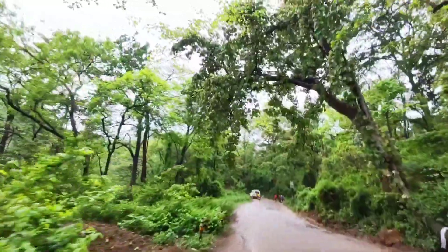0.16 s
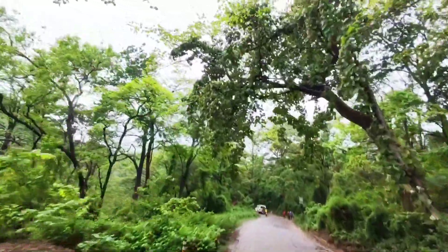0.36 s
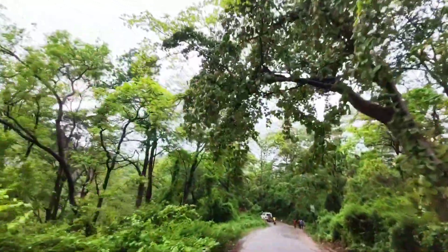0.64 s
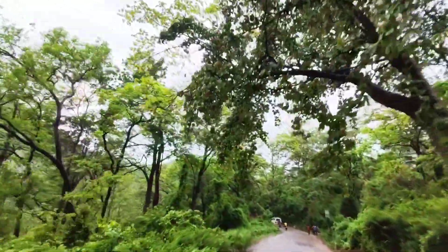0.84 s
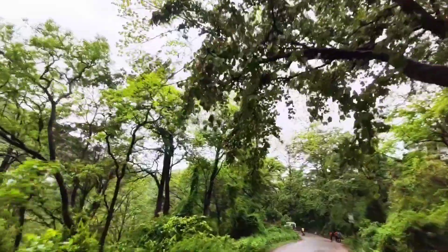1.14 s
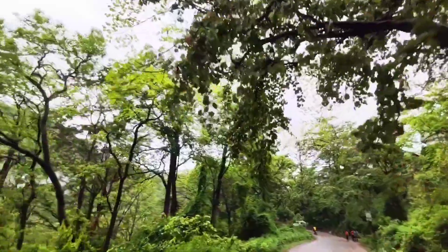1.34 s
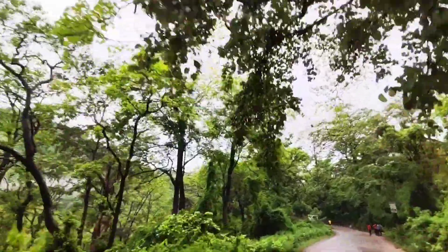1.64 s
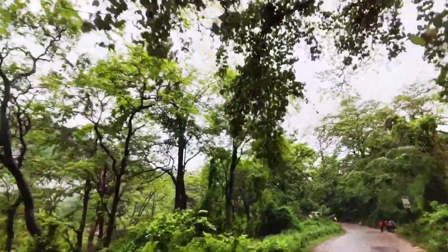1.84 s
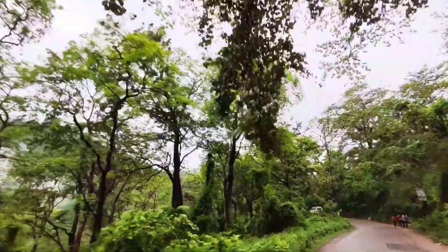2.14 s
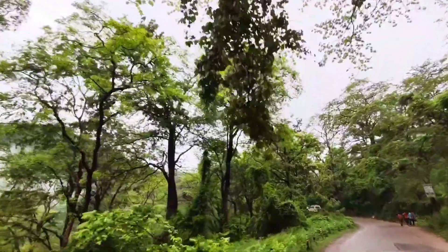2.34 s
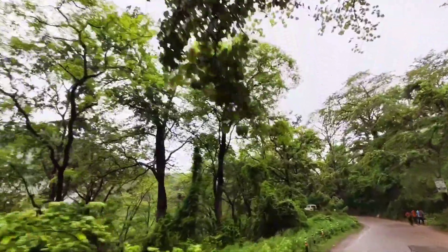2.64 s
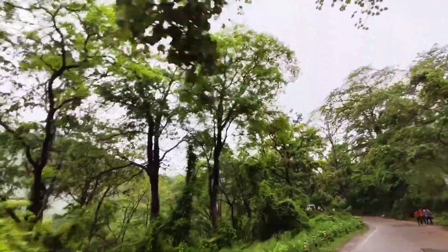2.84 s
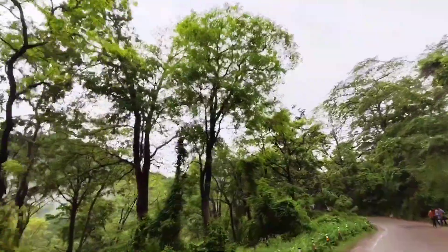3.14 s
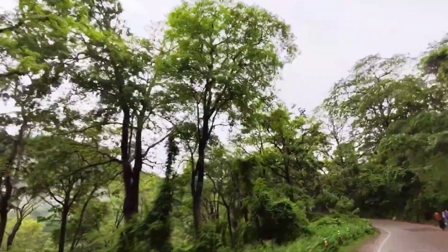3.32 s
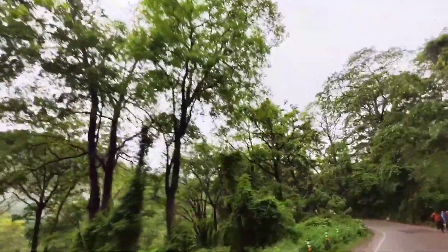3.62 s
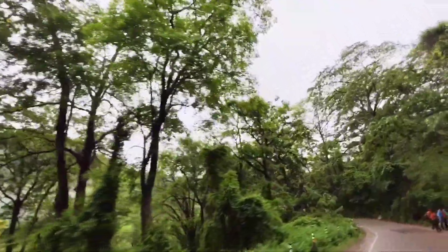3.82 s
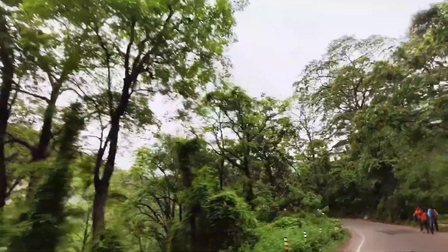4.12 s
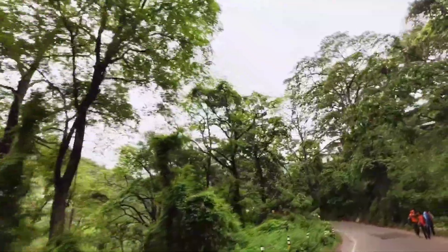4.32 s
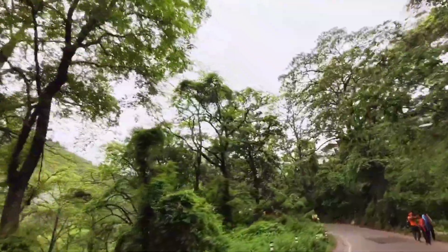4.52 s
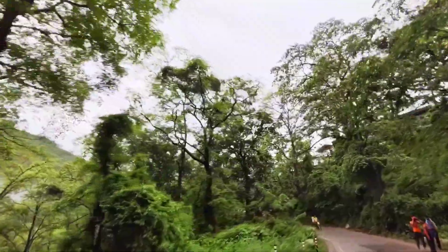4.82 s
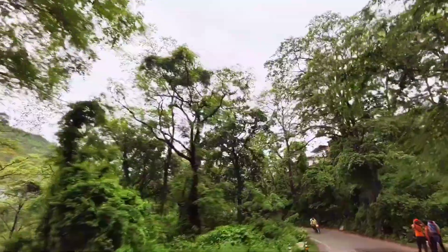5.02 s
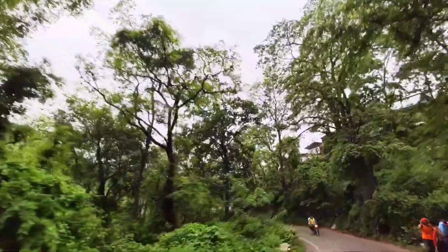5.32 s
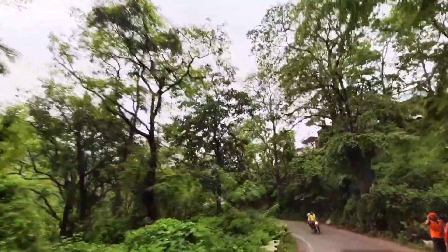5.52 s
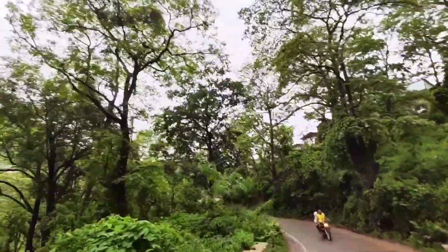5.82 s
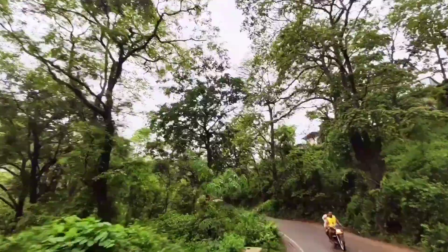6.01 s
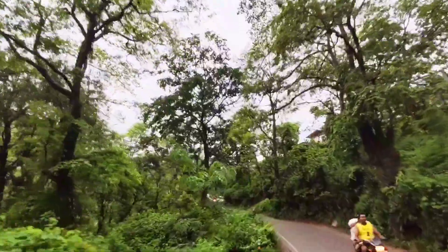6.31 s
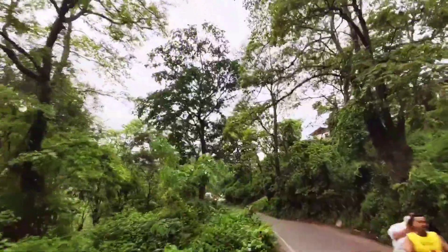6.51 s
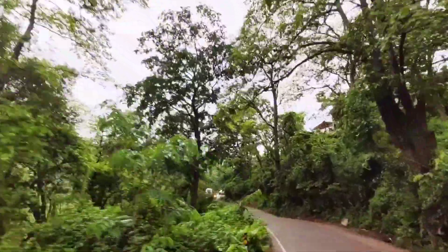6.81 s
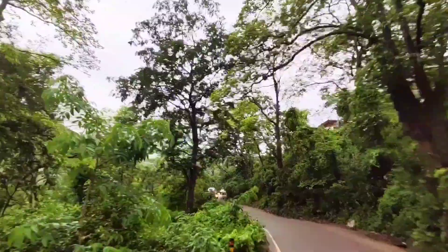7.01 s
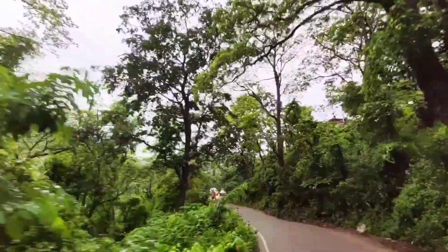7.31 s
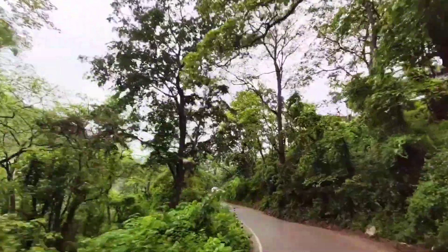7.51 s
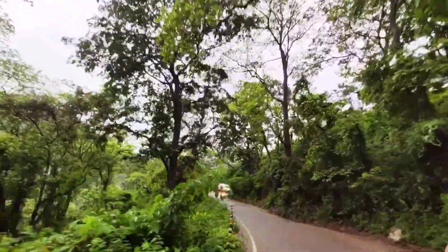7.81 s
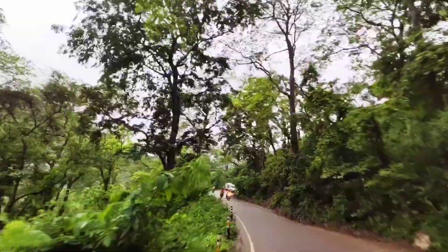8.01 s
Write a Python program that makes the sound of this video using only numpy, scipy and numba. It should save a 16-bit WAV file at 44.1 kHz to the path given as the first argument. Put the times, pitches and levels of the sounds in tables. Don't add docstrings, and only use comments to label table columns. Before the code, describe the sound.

Low wind rumble batters a handheld phone on a moving scooter, fluttering separately left and right. Beneath it the exhaust drones, gears whine upward and wet tyres hiss. Thin, high horns toot from ahead, each nearer, with smeared tree echoes. The throttle eases around two short close toots, then reopens into the hardest gusts. Finally oncoming tyres swish and a lower horn sounds at right.

```python
import sys
import numpy as np
from scipy import signal
from scipy.fft import rfft, irfft, next_fast_len
from scipy.io import wavfile
from scipy.ndimage import uniform_filter1d, minimum_filter1d
from numba import njit

SR = 44100
rng = np.random.default_rng(int(sys.argv[2]) if len(sys.argv) > 2 else 0)


def store_pcm(level_fs):
    pcm = np.round(np.clip(level_fs, -1, 1) * 32767).astype(np.int16)
    wavfile.write(sys.argv[1], SR, np.atleast_2d(pcm).T)


def makeup_ratio(level_db):
    decades = np.asarray(level_db, float) / 20
    return 10 ** decades


N = 359415
TIME = np.arange(N) / SR


def unit(x):
    return x / np.sqrt(np.mean(x ** 2) + 1e-18)


def columns(table):
    seconds, *rest = np.transpose(table)
    return [np.interp(TIME, seconds, column) for column in rest]


def sides(pan_db):
    return makeup_ratio(np.array([pan_db, -pan_db]) / 2)


def around(start, end):
    return np.arange(max(int(start * SR), 0), min(int(end * SR), N))


def bell(middle, half):
    return np.exp(-((TIME - middle) / half) ** 2)


def gate(start, length, fade):
    return np.clip(np.minimum(TIME - start, start + length - TIME) / fade, 0, 1)


@njit
def svf(x, hz, width):
    y, b, l = np.empty(len(x)), 0., 0.
    for i in range(len(x)):
        g, k = np.tan(np.pi * hz[i] / SR), width / hz[i]
        v = (b + g * (x[i] - l)) / (1 + g * (g + k))
        b, l, y[i] = 2 * v - b, l + 2 * g * v, k * v
    return y


def svf_twice(x, hz, width):
    return svf(svf(x, hz, 1. * width), hz, 1. * width)


def band(x, hz, width):
    return svf(x, np.full(len(x), 1. * hz), 1. * width)


def walk(rate):
    hold = int(SR / rate)
    steps = np.repeat(rng.standard_normal(N // hold + 1), hold)
    return 1.3 * uniform_filter1d(uniform_filter1d(steps, hold), hold)[:N]


def coloured(spectrum, flicker_db, rate, rise_db=0):
    size = next_fast_len(N)
    octave = np.log2(np.maximum(np.fft.rfftfreq(size, 1 / SR), 1))
    points, dbs = np.transpose(spectrum)
    colour = makeup_ratio(np.interp(octave, np.log2(points), dbs, left=-90, right=-90))
    noise = rfft(rng.standard_normal(size)) * colour
    centres = np.arange(np.floor(np.log2(points[0])), np.log2(points[-1]) + 1)
    out = 0
    for k, centre in enumerate(centres):
        part = irfft(noise * np.clip(1 - abs(octave - centre), 0, 1), size)[:N]
        out = out + part * makeup_ratio((flicker_db + rise_db * k) * walk(rate))
    return unit(out)


# frequency in Hz, level in dB per Hz.
WIND = [(12, -38), (20, -12), (38, -11.5), (107, 3.5), (169, 1.5), (238, -4.5), (312, -3.5), (341, -4),
        (387, -6.5), (498, -13.5), (1500, -30), (1950, -80), (3300, -120)]
FLOW_DB = [-21, -22.5]
# peak in seconds, rise in dB, half length in seconds, port (0 left, 1 right).
SWELLS = [(0, -12, 0.19, 0), (0.366, 4, 0.22, 0), (.9, 1.5, .25, 0), (1.647, 2, 0.34, 0),
          (2.05, 5.5, 0.12, 0), (2.18, 1, 0.21, 0), (2.63, 3.5, 0.26, 0), (3.188, 4, 0.11, 0),
          (3.643, 1, 0.28, 0), (4.06, 5, 0.38, 0), (4.522, -2, .08, 0), (5.613, 2, .25, 0),
          (6.11, 5.5, 0.28, 0), (6.457, -6.5, 0.17, 0), (7.052, 4, 0.4, 0), (8.05, 4.5, 0.24, 0),
          (0.388, 4, 0.057, 1), (0.95, -0.5, 0.31, 1), (2.06, 2.5, 0.21, 1), (2.996, 2, 0.28, 1),
          (3.615, 6, 0.45, 1), (4.206, 9, 0.11, 1), (4.556, 8.5, 0.13, 1), (5.386, 14, 0.18, 1),
          (5.65, -9, 0.18, 1), (6.096, 0.5, 0.28, 1), (6.467, -6, 0.31, 1), (6.938, 12, 0.24, 1),
          (7.675, 4.5, 0.33, 1)]


def rumble(port):
    flow_db = FLOW_DB[port] + 0.5
    for s, db, half, p in SWELLS:
        if round(p) == port:
            flow_db = flow_db + db * np.clip(1 - abs(TIME - s) / half, 0, 1)
    return unit(coloured(WIND, 1.6, 32, rise_db=0.38) * makeup_ratio(2.4 * walk(30))) * makeup_ratio(flow_db)


# centre in seconds, level in dB, length in seconds, pitch in Hz, port (0 left, 1 right).
SQUALLS = [(0.009, -16, 0.14, 230, 0), (0.931, -24, 0.045, 154, 0), (1.147, -15, 0.045, 159, 0),
           (3.482, -15.5, 0.049, 149, 0), (6.598, -14, 0.024, 246, 0), (6.904, -15, 0.081, 191.9, 0),
           (7.056, -5.5, 0.075, 280, 0), (7.177, -5.5, 0.067, 236, 0), (7.483, -15, 0.054, 214.6, 0),
           (2.487, -9.5, 0.044, 148, 1), (3.916, -15.5, 0.055, 172, 1), (4.224, -21, 0.066, 278, 1),
           (4.56, -10.5, 0.047, 218.1, 1), (5.403, -11, .074, 222, 1), (5.432, -7.5, 0.058, 150, 1),
           (5.971, -10.5, 0.077, 131, 1), (6.139, -15, 0.056, 246, 1), (6.826, -9, 0.051, 134, 1),
           (7.369, -10.5, 0.051, 175.4, 1), (7.965, -9.5, 0.037, 193.2, 1)]


def squalls(port):
    out = np.zeros(N)
    for s, db, length, hz, p in SQUALLS:
        if round(p) != port:
            continue
        at = around(s - 1.5 * length, s + 1.5 * length)
        t = at / SR - s
        noise = rng.standard_normal(len(at))
        shape = np.exp(-(t / (.5 * length)) ** 2)
        swirl = shape * band(band(band(noise, hz, 1.3 * hz), hz, 1.6 * hz), hz, 2.1 * hz)
        sweep_hz = 700 * 2 ** np.clip(t / length, -.7, .7)
        spill = shape ** 2 * svf_twice(noise, sweep_hz, 450)
        gust = unit(swirl) + makeup_ratio(-26) * unit(spill)
        out[at] += makeup_ratio(db - 1.5) * gust * np.sqrt(np.mean(shape ** 2))
    return out


# centre in seconds, peak in dB, pitch in Hz, width in ms.
EDDIES_LEFT = [(0.205, 1, 238, 5.6), (0.279, -2.5, 176, 10.5), (0.298, -0.5, 224, 1.1),
               (1.486, -5.5, 265.7, 5.6), (1.512, 0.5, 220, 4.1), (1.536, 1, 152, 8.3),
               (1.574, -1, 352, 4.8), (1.605, 3, 272, 7.4), (1.863, -3, 338, 21), (1.9, 0, 191, 6),
               (2.291, 0, 181, 12.4), (2.853, -2, 305, 7.6), (2.927, -0.5, 240, 5.3),
               (3.114, -1.5, 180, 6.2), (3.165, -4, 182, 8.1), (3.331, 4, 323, 4.55), (3.343, -1, 295, 8.4),
               (3.356, -3, 200, 4.5), (3.491, -5.5, 190, 5.8), (3.621, -2.5, 277, 14), (3.641, 3, 215, 1.9),
               (3.79, -0.5, 317.5, 4.0), (4.06, -5, 278, 5.5), (4.179, -3, 213, 3.4), (4.452, 3, 262, 3.75),
               (4.87, -5, 288, 4.2), (4.884, -0.5, 277, 4.3), (5.103, -0.5, 315, 9.5), (5.25, 1, 220, 3.4),
               (5.494, -3.5, 238, 9.8), (5.719, -3.5, 337, 19), (5.765, 1, 195, 4.2),
               (6.085, 1.5, 298, 11.7), (6.161, -3, 275, 5.6), (6.227, -3, 254, 14), (6.782, 9, 212, 4.7),
               (6.874, -4.5, 250, 6.2), (6.889, -6.5, 200, 5.5), (6.931, -5, 314, 4.9),
               (7, -11, 272.4, 4.5), (7.038, -8, 303, 7.9), (7.05, 6, 315, 3.6), (7.069, 0, 365, 6),
               (7.084, -8, 287, 5.7), (7.104, -6, 223.7, 4), (7.143, -1, 214, 5.2), (7.163, -13, 358, 3.5),
               (7.179, -3, 356, 7.0), (7.26, -1.5, 253.4, 4.0), (7.332, -2.5, 214, 6.3)]
EDDIES_RIGHT = [(2.478, 0.5, 165, 3.5), (2.495, -15, 163, 5.2), (2.551, 0, 156, 7.1), (3.344, 0, 332, 15),
                (3.601, -4, 195.8, 9.5), (3.838, -4, 230.8, 4.16), (3.88, -8, 208.6, 5),
                (3.913, -10, 193, 6.9), (3.934, -7, 201, 13), (3.955, -8, 251, 5.8),
                (4.115, -4.5, 201, 4.0), (4.147, 2, 270, 6.7), (4.177, -5, 256, 4.7),
                (4.199, -14, 229, 3.2), (4.208, 3, 360, 3.4), (4.241, -5, 214, 8.8), (4.29, -4.5, 245, 3.9),
                (4.542, 6, 186, 2.7), (4.572, -2.5, 285, 5.2), (5.188, -7.5, 236, 5.8),
                (5.258, -2, 166, 9.1), (5.331, -4.0, 207, 4.4), (5.344, -5, 241, 4.0), (5.373, -9, 234, 16),
                (5.387, 0.5, 207, 3), (5.402, -9, 202, 3.9), (5.418, -14, 220.7, 5.6),
                (5.437, -7, 238, 4.7), (5.473, -7.5, 206, 16), (5.494, -3, 230, 3.8),
                (6.006, -11, 156, 8.5), (6.112, -3, 266, 4), (6.133, -3, 260, 3.2), (6.155, 2, 336, 3),
                (6.798, -20, 156, 15.4), (6.817, 8, 159, 5.9), (6.838, -3, 159, 11), (6.858, 3, 160, 17),
                (6.889, -2, 235, 9.8), (6.912, -3, 190, 3.8), (6.941, 4, 208, 3.5), (6.959, 6.5, 327, 7.1),
                (6.998, -13, 278, 5), (7.011, 0.5, 344, 7.2), (7.054, 0.5, 178, 15), (7.074, -1, 255, 5.7),
                (7.089, -3, 182, 7.7), (7.106, -10, 224, 14), (7.35, -1, 286, 3.8), (7.753, -0.5, 168, 5.7)]


def pops(port):
    out = np.zeros(N)
    for s, db, hz, ms in (EDDIES_LEFT, EDDIES_RIGHT)[port]:
        turn, glide = rng.uniform(-0.89, 1, 2)
        at = around(s - .04, s + .04)
        t, wide = at / SR - s, 0.92 * ms / 1665
        cycles = hz * (t + 0.42 * glide * wide * np.log(np.cosh(t / wide)))
        out[at] += makeup_ratio(db - 2) * np.exp(-(t / wide) ** 2) * np.cos(2 * np.pi * cycles + np.pi * turn)
    return out


def wind(port):
    return rumble(port) + squalls(port) + pops(port)


# start in seconds, peak in dB, left minus right in dB.
SNAPS = [(0.267, -14, 17), (1.481, -14, 10.5), (1.51, -10.5, 17), (1.571, -25, 11.5), (1.621, -14, 13),
         (1.743, -23, 9.5), (1.863, -7, 21), (1.993, -23, 5.0), (2.142, -33, 9.5), (2.854, -21, 10),
         (3.328, -7, 8), (3.46, -25, 12), (3.619, -6.5, 15), (3.788, -31, 4.5), (3.95, -18, 1.5),
         (4.066, -13, 15), (4.141, -15, -9), (4.205, -14, -11.5), (4.226, -10.5, -14), (4.444, -9.5, 18),
         (4.564, -12, -21), (4.869, -14, 18), (5.096, -6.5, 21), (5.467, -14, 1.0), (5.646, -17, 8),
         (5.713, -15, 26.0), (5.721, -5, 34), (5.964, -22, -2), (5.979, -20, 1), (6.065, -14, 18),
         (6.079, -11, 20), (6.214, -20, 10), (6.147, -13, 8.5), (6.493, -16, 4), (6.663, -9, 1.5),
         (6.825, -21, 4), (6.886, -17, -8), (6.956, -8, -20), (6.999, -8, -2.5), (7.017, -2.5, -5),
         (7.032, -16, 10), (7.066, -12, 10), (7.08, -9, 8), (7.18, -8, 15), (7.346, -14, 9),
         (7.133, -25, 10.5), (7.164, -7, 19.5), (7.332, -18, 6), (7.386, -14, -4), (8.05, -26, 12.0)]


def snaps():
    out, t = np.zeros((2, N)), np.arange(1300) / SR - .01
    for s, db, pan_db in SNAPS:
        at = int((s - .01) * SR) + np.arange(1300)
        noise = rng.standard_normal(1300)
        ragged = band(band(band(noise, 556, 700), 556, 800), 556, 900)
        wave = np.exp(-((t - 0.0037) / 0.0079) ** 2) * ragged
        share = 2 * sides(pan_db) / sides(pan_db).sum()
        out[:, at] += makeup_ratio(db - 6) * share[:, None] * wave / abs(wave).max()
    return out


# frequency in Hz, width in Hz, level in dB.
PIPE = [(150, 22, 1.5), (321.9, 27.7, 6.5), (431.6, 50, -3.5)]
REOPEN_S = 6.25


def exhaust(turns, mesh_hz, throttle_db):
    fired = np.diff(np.floor(turns), prepend=0.) * makeup_ratio(5.0 * rng.standard_normal(N))
    pipe = unit(sum(makeup_ratio(db) * band(band(fired, hz, 1.53 * w), hz, 1.53 * w) for hz, w, db in PIPE))
    boom_db = 5 * np.exp(-((mesh_hz - 1153) / 12.4) ** 2) * (TIME < REOPEN_S)
    swell_db = bell(4.9, 0.18)
    return pipe * makeup_ratio(-29 + 2.3 * throttle_db + swell_db + boom_db)


# frequency in Hz, level in dB.
CASE = [(930, -47), (975, -50), (1040, -51), (1090, -47), (1105, -41), (1150, -37), (1200, -47),
        (1880, -43), (2070, -36), (2200, -44), (2330, -42)]
# multiple of the mesh rate, top level in dB, time of the top in
# seconds, fall in dB per second either side.
SIDE_GEARS = [(1.55, -46, 0, 4), (1.49, -43, 2.05, 14), (3, -44, 0, 4), (4.12, -46, 1.1, 9),
              (4, -45, 1.1, 9), (1.54, -45, 7.75, 14), (.775, -39, 7.5, 250)]


def gear_whine(mesh_hz, throttle_db):
    reopened = TIME > REOPEN_S
    case_hz, case_db = np.transpose(CASE)
    mesh_db = np.interp(mesh_hz, case_hz, case_db) + 2 * throttle_db - 5 * reopened
    second_db = np.interp(2 * mesh_hz, case_hz, case_db) + 2 * throttle_db + 2 * reopened
    lines = [(1, mesh_db), (2, second_db)]
    lines += [(k, db - loss_db * abs(TIME - s)) for k, db, s, loss_db in SIDE_GEARS]
    teeth = np.cumsum(mesh_hz * (1 + 0.002893 * walk(20))) / SR
    out = np.zeros((2, N))
    for k, db in lines:
        grain = unit(walk(80 * k)) + 1j * unit(walk(80 * k)) + 1.2 / max(k - 1, 1)
        line = grain * makeup_ratio(db) * np.exp(2j * np.pi * k * teeth)
        for side in (0, 1):
            heard = (line * makeup_ratio(0.21 * walk(30)) * np.exp(.3j * k * side)).imag
            out[side] += heard * sides(11.5 * (k == 1))[side]
    return out


# frequency in Hz, level in dB per Hz.
CLATTER = [(350, -9), (600, -10.5), (900, -5), (1200, -1.5), (1700, -3.5), (2200, -4), (2600, -8.5),
           (3300, -7.5), (3950, -9), (4250, -14), (6000, -16.5), (6900, -23), (7300, -12)]


def clatter(turns, throttle_db):
    beat = 1 + 0.031 * np.cos(2 * np.pi * turns)
    level = beat * makeup_ratio(-31.5 + throttle_db)
    return level * np.array([coloured(CLATTER, 2.08, 9) for _ in range(2)])


# frequency in Hz, level in dB per Hz.
HISS = [(4590, 2.5), (7800, -4.5), (8690, -1), (10900, -1.5), (11800, 0.5), (13900, -3.5), (14450, -11)]


def tyre_hiss(hiss_db):
    spray_db = 0.82 * walk(8.8) + 0.79 * walk(21)
    return makeup_ratio(hiss_db + 3.0 + spray_db) * np.array([coloured(HISS, 0.68, 5.1) for _ in range(2)])


# time in seconds, gear mesh rate in Hz, throttle in dB against full.
RIDE = [(0, 929.3, 2), (.45, 931.2, 0), (1.0, 966.5, 0.4), (1.6, 971, -1), (2.1, 1016, 0), (2.5, 1046, 0.6),
        (3.4, 1100, 0.5), (3.8, 1143, 0.9), (4.6, 1159, -0.7), (5.3, 1168, -2.5), (5.6, 1168, -7.5),
        (6.2, 1093, -7.5), (6.32, 1089, -4.5), (6.7, 1110, 0), (7.05, 1105, -1.5), (7.4, 1136, -0.5),
        (7.85, 1153, 1), (8.15, 1141, -1.5)]
# time in seconds, hiss in dB, left minus right in dB.
ROAD = [(0, -46.5, -8.5), (1.8, -47.5, -10.5), (2.4, -44.5, -7), (3.7, -47, -8), (4.4, -47.5, -7),
        (5.7, -46, 0.5), (5.81, -54, -8), (5.95, -49, -3), (6.4, -43, -2), (6.6, -49.5, -3),
        (7.04, -45, -4.5), (7.26, -49, -11), (7.9, -41.5, -6), (8.15, -41.5, 0)]


def scooter():
    mesh_hz, throttle_db = columns(RIDE)
    hiss_db, pan_db = columns(ROAD)
    turns = np.cumsum(mesh_hz / 21.5 * (1 + .015 * walk(40))) / SR
    engine = gear_whine(mesh_hz, throttle_db) + clatter(turns, throttle_db)
    near = sides(0.62 * pan_db) * engine + sides(pan_db) * tyre_hiss(hiss_db)
    return exhaust(turns, mesh_hz, throttle_db) + near


# start in seconds, length in seconds, ninth multiple in Hz, upper multiples in dB, echo from
# the trees in dB.
TOOTS = [
    (-.3, 0.78, 3850, -55, -41),
    (1.905, 0.98, 3856, -55, -36.5),
    (4.509, 1.21, 3884, -44.5, -31.5),
    (5.916, 0.21, 3900, -35.5, -26.5),
    (6.211, 0.213, 3889, -37, -29),
    (7.814, 0.58, 3528, -43, -25.5),
]
SHARP_STARTS = [0.002, 0.0022, 0.0012, 0.012, .001]
# multiple of its beat, level in dB against the ninth.
HORN = [(7, -32), (8, -18), (9, 4.5), (10, -34), (13, -28), (14, -38), (22, -32.5), (23, -30.5), (24, -58),
        (26, -50), (27, -46)]
# time in seconds, level in dB.
REACH = [(0, -48), (.2, -51), (.35, -43), (0.451, -51), (1.93, -46), (2.034, -31), (2.1, -42), (2.72, -33),
         (2.902, -52), (4.51, -26.5), (4.628, -32), (4.655, -25), (4.831, -23), (5.22, -29), (5.262, -23),
         (5.7, -22.5), (5.93, -19.5), (6.01, -16), (6.04, -29), (6.07, -22), (6.11, -44), (6.21, -26),
         (6.287, -27), (6.31, -20), (6.37, -22.5), (6.43, -26)]
LAST_REACH = [(7.81, -33), (7.83, -29), (7.92, -29), (7.95, -32), (8.15, -33)]


def toot(row, reach, pan_db, sharp):
    start, length, hz, upper_db, _ = row
    reach_db, held = columns(reach)[0], np.clip(TIME - start, 0, length)
    hz = hz + 11.21 * (1 - np.exp(-held / 0.408)) - 15.25 * np.exp((held - length) / 0.073) + 2.5 * walk(18)
    bend = 1 + sharp * np.exp(-held / 0.0059)
    lag = np.array([[.00021], [0]])
    phase = 2 * np.pi * (np.cumsum(hz * bend) / SR + lag * hz) / 9
    buzz = makeup_ratio(reach_db) * np.sin(9 * phase)
    for k, db in HORN:
        if k != 9:
            level_db = 4 * walk(30) + upper_db + db + 17 - 5 * (k > 9)
            buzz = buzz + makeup_ratio(level_db) * np.sin(k * phase + .06 * k * walk(150))
    rasp = np.array([band(n, 8700, 6200) for n in rng.standard_normal((2, N))]) * makeup_ratio(upper_db - 0.5)
    release = np.exp(-np.clip(TIME - start - length + 0.0094, 0, 1) / 0.0094)
    envelope = gate(start, 9, .003) * release
    return (np.sqrt(2) * buzz * makeup_ratio(1.2 * walk(30)) + rasp) * sides(pan_db + 2 * walk(8)) * envelope


def horns():
    out = toot(TOOTS[-1], LAST_REACH, -12.5, 0)
    for row, sharp in zip(TOOTS[:-1], SHARP_STARTS):
        out = out + toot(row, REACH, 0.5, sharp)
    return out


# frequency in Hz, width in Hz, level in dB.
SHIFTS = [(3727, 30, -2), (3790, 42, -2), (3860, 54, -5.5), (3680, 60, -16), (3390, 150, -20)]
LAST_SHIFTS = [(3580, 53, -12), (3690, 53, -6), (3730, 92, -15.5)]


def trunks(toots, shifts):
    silent = 1 - np.clip(sum(gate(t[0], t[1], 0.005) for t in toots), 0, 1)
    late = signal.lfilter([1 / 4000], [1, 1 / 4000 - 1], silent * (TIME > .1))
    blur = 0
    for k, horn_db in HORN[:3]:
        for hz, width, db in shifts:
            centre = hz * k / 9 * (1 - .009 * late + .004 * walk(9))
            echo = unit(svf_twice(rng.standard_normal(N), centre, width))
            blur = blur + makeup_ratio(db + 0.9 * horn_db + 2.5 * walk(12)) * echo
    return unit(blur)


def trees(toots, shifts, rise_s):
    blur = np.array([trunks(toots, shifts) for _ in range(2)])
    near, far = 0, 0
    for s, length, _, _, db in toots:
        rise_db = 9 * np.exp(-abs(TIME - s) / rise_s)
        tail_db = 95 * np.clip(TIME - s - length, 0, 3)
        arrived = np.clip((TIME - s - 0.016) / 0.027, 0, 1)
        near = near + makeup_ratio(db + 3.0 - rise_db - tail_db) * arrived
        far = far + makeup_ratio(db - 6.5) * gate(s + 0.2, length + 0.2, 0.065)
    slope = np.array([unit(band(band(n, 3720, 60), 3720, 60)) for n in rng.standard_normal((2, N))])
    return (near * blur + far * slope) * makeup_ratio(1.2 * walk(6.8)) * sides(-7 + 1.9 * walk(5))


# time in seconds, centre in Hz, level in dB.
SWISH = [
    (7.5, 2500, -60),
    (7.62, 2850, -38),
    (7.77, 2990, -33.5),
    (7.9, 3000, -33.5),
    (8.15, 2946, -33.5),
]


def swish():
    hz, db = columns(SWISH)
    noise = rng.standard_normal((2, N))
    rush = np.array([unit(svf_twice(n, hz, 970)) * makeup_ratio(2.9 * walk(20)) for n in noise])
    return rush * makeup_ratio(db) * sides(-0.5)[:, None] * gate(SWISH[0][0], 1, 0.0089)


def tick():
    after = np.clip(TIME - 5.097, 0, 1)
    click = (after > 0) * np.exp(-after / 0.00083) * unit(band(rng.standard_normal(N), 2500, 5000))
    return makeup_ratio(-24) * click * sides(8)[:, None]


def scene():
    ports = np.array([wind(0), wind(1)])
    echoes = trees(TOOTS[:-1], SHIFTS, 0.077) + trees(TOOTS[-1:], LAST_SHIFTS, 0.027)
    return ports + snaps() + scooter() + horns() + echoes + swish() + tick()


# frequency in Hz, threshold in dB against the tone.
MASKED = [(4230, -70), (4330, -36.5), (4600, -38), (5050, -39), (5400, -48), (6200, -47), (6700, -47),
          (7400, -56), (8000, -48), (8600, -46), (9200, -46.5), (14500, -46)]


def masked(x):
    window = np.sin(np.pi * (np.arange(2048) + .5) / 2048)
    hz, _, z = signal.stft(np.pad(x, ((0, 0), (682, 0))), SR, window, 2048, 1024)
    in_tone = (hz > 3400) & (hz < 4050)
    tone = np.sqrt((abs(z[:, in_tone]) ** 2).sum(axis=1).mean(axis=0))
    tone = np.minimum(tone, np.percentile(tone, 88))
    patches = np.repeat(rng.standard_normal((129, z.shape[2])), 8, axis=0)[:len(hz)]
    streaks = np.repeat(rng.standard_normal((342, z.shape[2])), 3, axis=0)[:len(hz)]
    scatter = np.where(hz[:, None] < 5500, patches, 1.3 * streaks)
    scatter = uniform_filter1d(scatter, 3, axis=1) * np.sqrt(3)
    threshold_db = np.interp(hz, *np.transpose(MASKED), left=-150)[:, None]
    edge = makeup_ratio(threshold_db + 4.5 * scatter) * tone
    return signal.istft(z * (abs(z) > edge), SR, window, 2048, 1024)[1][:, 682:682 + N]


def limiter(x):
    span = int(.012 * SR)
    peak = -minimum_filter1d(-abs(x), span)
    return x * uniform_filter1d(np.minimum(1, .97 / (peak + 1e-9)), span)


def top_cut(x):
    return signal.sosfilt(signal.butter(12, 14430, fs=SR, output="sos"), x)


def record(dry):
    heard = np.array([x - 0.85 * band(x, 7290, 1120) for x in dry])
    tilt = 0.36 * gate(5.75, 9, .1)
    heard = np.array([x - tilt * band(x, 7840, 2000) for x in heard])
    return top_cut(masked(limiter(heard)))


dry = scene()
out = record(dry)
store_pcm(out)
```